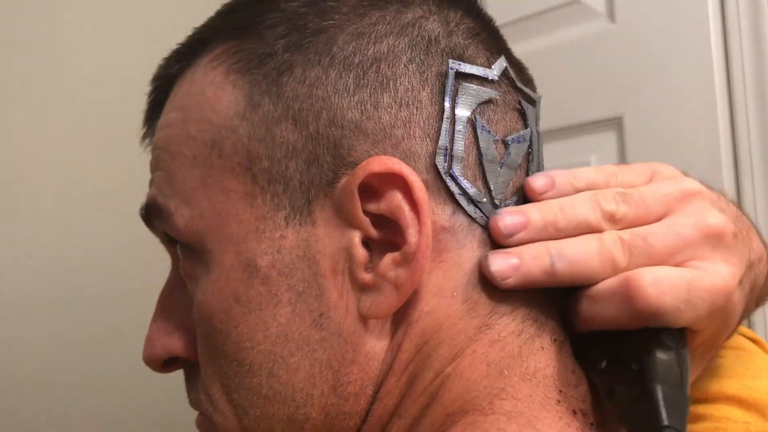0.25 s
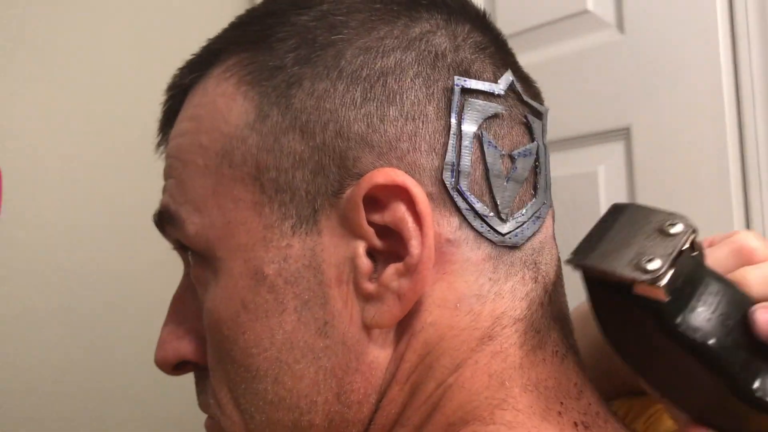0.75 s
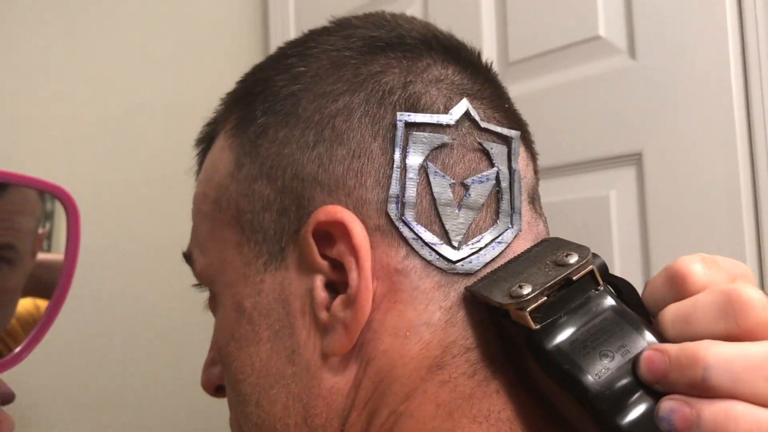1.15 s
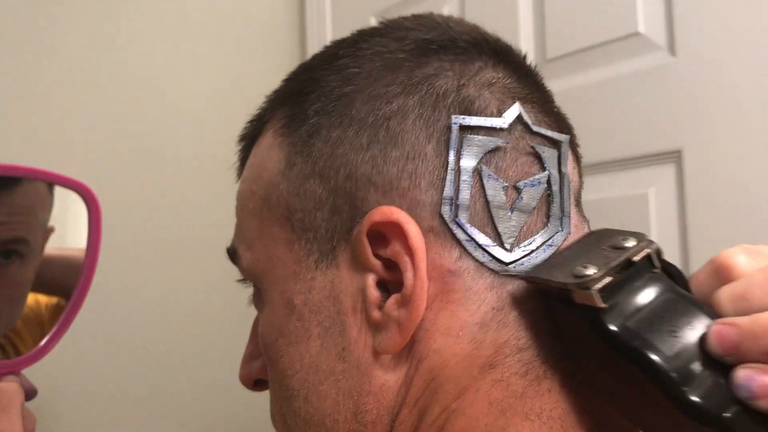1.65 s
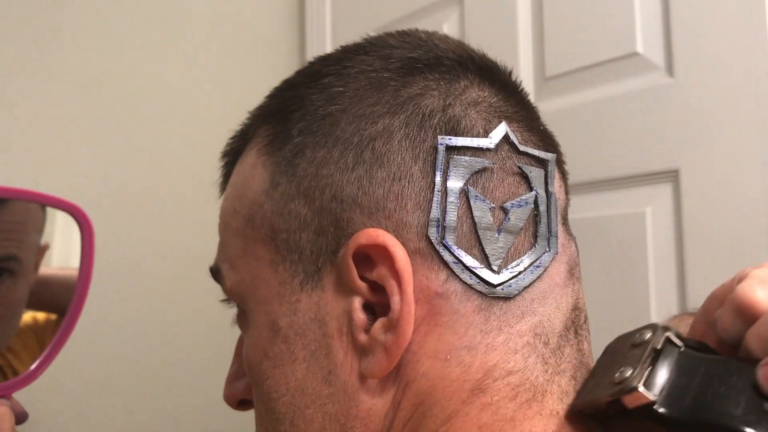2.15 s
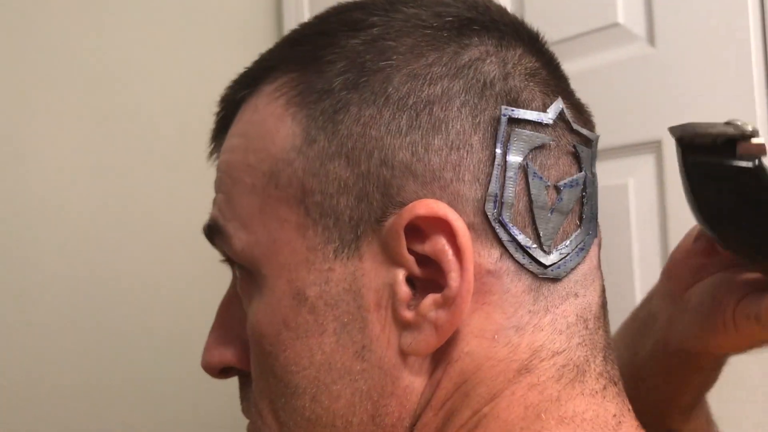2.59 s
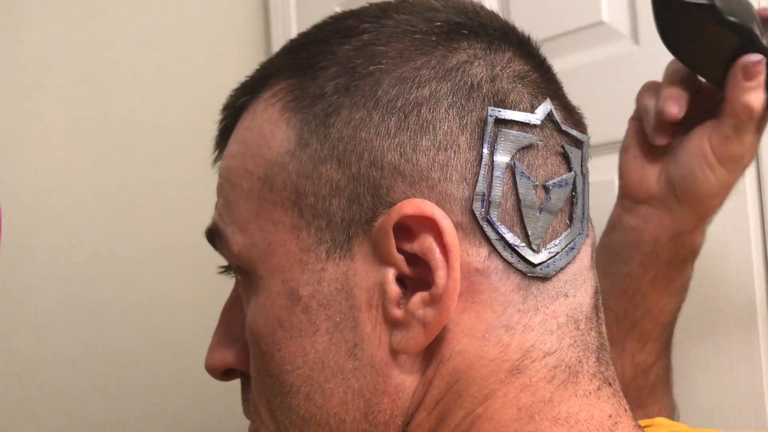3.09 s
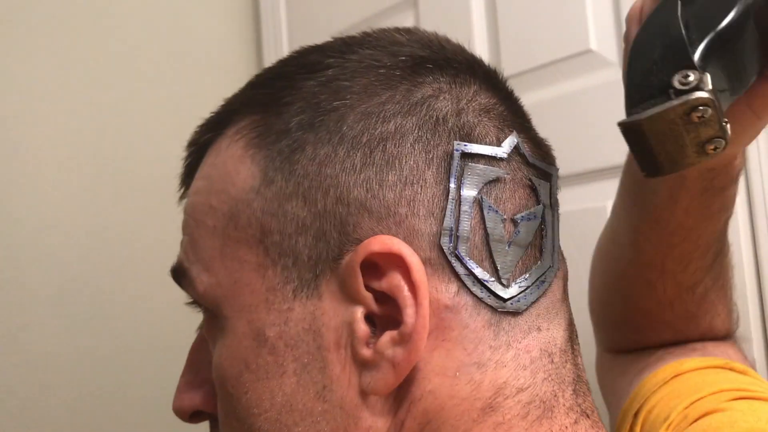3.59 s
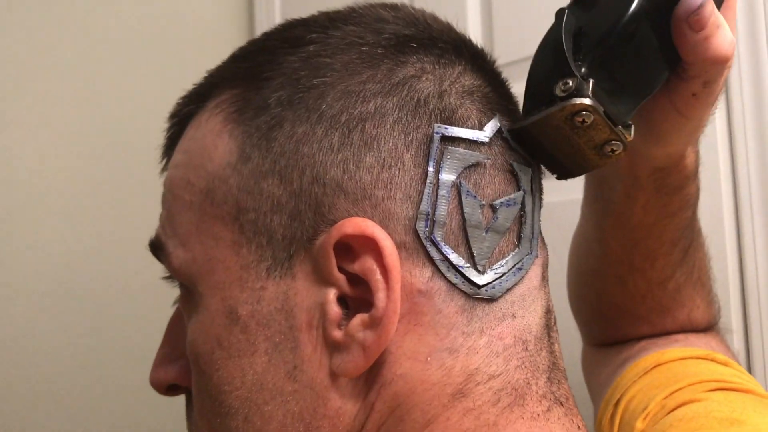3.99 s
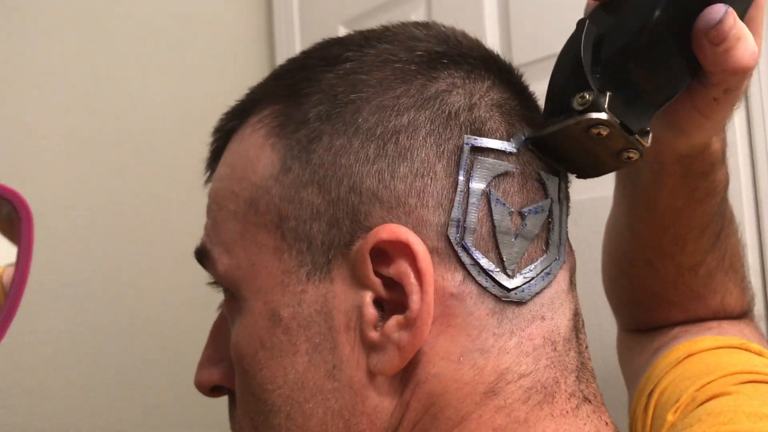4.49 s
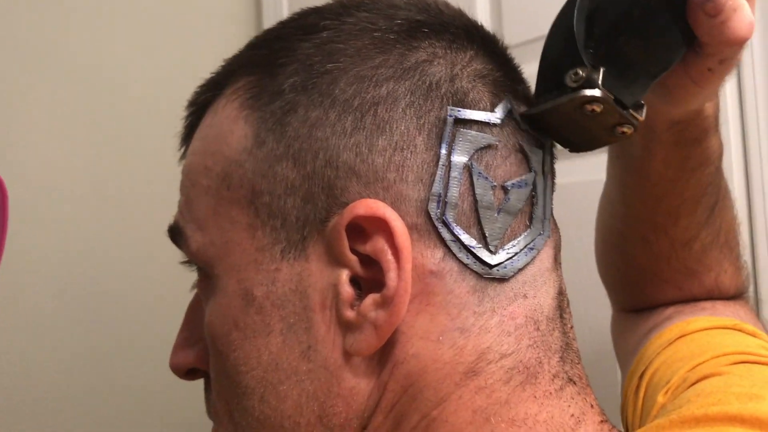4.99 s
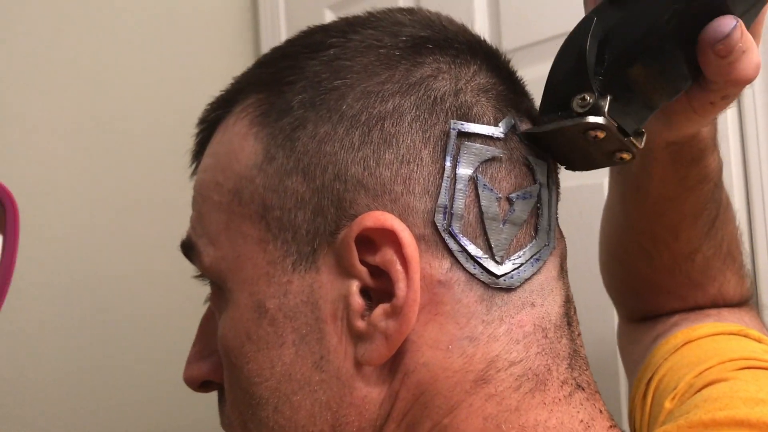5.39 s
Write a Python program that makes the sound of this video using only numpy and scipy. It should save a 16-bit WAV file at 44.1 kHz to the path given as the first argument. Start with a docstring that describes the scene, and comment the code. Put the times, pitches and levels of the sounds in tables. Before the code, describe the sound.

A steady low motor hum with a nasal, metallic buzz and fine blade hiss, recorded close between near walls. After a brief muffled spell the tone becomes fuller, with gritty snips, a sharp tooth click and a soft thud; midway it drops thinner as the clippers swing away, then repeated short crunchy strokes follow to the end, with faint hand bumps.

```python
"""Mains hair clippers buzz close to the microphone in a small room while a man trims his own hair.
A last bite of hair clears as he palms them; he lifts them and shaves the nape in short strokes, with one soft thud.
He swings them through the air and overhead, then edges the back of the crown and tips them to the end.
Harmonics of one blade stroke make the buzz; noise gated by that stroke makes the hairs snap and the blade hiss.
Short noise bursts are catches of the teeth and bumps of hand and case; quiet room air lies beneath."""
import sys
import numpy as np
from scipy import signal
from scipy.fft import rfft, irfft
from scipy.io import wavfile

SR = 44100
rng = np.random.default_rng(int(sys.argv[2]) if len(sys.argv) > 2 else 0)


def put_to_file(sound):
    """Save the sound as 16-bit audio at rate SR, in the file named by the first command-line argument."""
    columns = np.atleast_2d(sound).T  # one column per channel
    safe = np.clip(columns, -1, 1)
    whole_steps = np.round(safe * 32767)
    wavfile.write(sys.argv[1], SR, whole_steps.astype(np.int16))


N = 249165
T = np.arange(N) / SR  # time [s]
STROKE_HZ = 359.87  # mean rate of the blade stroke


def undb(db):
    """Decibels to gain."""
    return 10 ** (np.asarray(db) / 20)


def unit(x):
    """Scale to rms 1."""
    return x / np.sqrt(np.mean(x ** 2))


def curve(table, axis=1):
    """One column of a table, joined by straight lines in time."""
    rows = np.array(table)
    return np.interp(T, rows[:, 0], rows[:, axis])


def colour(x, table, axis=1):
    """Filter by a spectrum of (frequency, dB) points joined over log frequency; rms 1."""
    rows = np.array(table)
    hz = np.fft.rfftfreq(N, 1 / SR)
    db = np.interp(np.log(hz + 1), np.log(rows[:, 0]), rows[:, axis])
    return unit(irfft(rfft(x) * undb(db), N))


def walk(turns):
    """Smooth random course of spread near 1 that reaches a new value at every whole turn."""
    points = rng.standard_normal(4096)
    i = turns.astype(int)
    ease = np.sin(np.pi / 2 * (turns - i)) ** 2
    return points[i] + ease * (points[i + 1] - points[i])


def resonate(x, hz, width):
    """One ringing resonance of a given bandwidth [Hz]; rms 1."""
    return unit(signal.lfilter(*signal.iirpeak(hz, hz / width, fs=SR), x))


def repeat(x, memory):
    """Each stroke partly repeats the one before, so noise gathers round the harmonics; rms 1."""
    one_stroke = np.exp(-2j * np.pi * np.fft.rfftfreq(N, 1 / SR) / STROKE_HZ)  # delay by one stroke
    return unit(irfft(rfft(x) / (1 - np.tanh(memory) * one_stroke), N))


# colour of the air in the small room, relative: (frequency [Hz], level [dB])
AIR_COLOUR = [(25, -55), (50, -50), (70, -26), (100, -11), (140, 3.5), (200, 3), (300, 2), (500, -4.5),
              (900, -4.5), (1500, -10.5), (4000, -29), (15000, -25)]


def air(hum_hz=144.7, hum_db=-84.5):
    """Room background: low-weighted noise of slightly restless level, with a faint hum of drifting phase."""
    air_db, restless_db = -72, 1.2
    hum = np.sqrt(2) * undb(hum_db) * np.sin(2 * np.pi * hum_hz * T + walk(T * 4))
    level = undb(air_db + restless_db * walk(T * 9))
    return hum + level * colour(rng.standard_normal(N), AIR_COLOUR)


def room(x, t60=0.1, wet_db=-7.5):
    """Close walls: a short tail of decaying noise, t60 [s], that begins 3 ms after the direct sound."""
    t = T[:SR // 2]
    tail = rng.standard_normal(len(t)) * np.exp(-np.log(1000) * t / t60) * (t > .003)
    echo = signal.fftconvolve(x, tail / np.linalg.norm(tail))[:N]
    return x + undb(wet_db) * echo


def burst(start, db, low_hz, high_hz, decay, grain, tap):
    """A short contact: a first touch, then gritty noise that dies away, both in one band."""
    t = T[:SR // 4]
    roughness = undb(grain * rng.standard_normal(len(t)))  # grain is its spread in dB
    grit = unit(rng.standard_normal(len(t)) * roughness) * np.exp(-t / decay)
    grit[0] += tap * np.sqrt(SR * .001)
    edges = [low_hz, min(high_hz, SR / 2 - 1000)]
    hit = signal.sosfilt(signal.butter(2, edges, "band", fs=SR, output="sos"), grit)
    hit *= undb(db) * np.sqrt(decay * SR / 2) / np.linalg.norm(hit)  # energy set by level and decay
    return np.pad(hit, (int(start * SR), N))[:N]


def thud(start, hz, db, decay, rumble_db, rumble_decay):
    """A padded blow: a low ring that swells briefly and decays, over a short rumble."""
    age = np.maximum(T - start, 0)
    swell = 1 - np.exp(-age / .011)
    ring = 2 * undb(db) * np.sin(2 * np.pi * hz * age) * np.exp(-age / decay) * swell
    return ring + burst(start, rumble_db, low_hz=58, high_hz=100, decay=rumble_decay, grain=1, tap=1)


# Levels below are those of the direct sound, before the room tail.
# teeth catch a tuft or scrape the skin: (time [s], level [dB], lowest [Hz], highest [Hz], decay [s])
TOOTH_CATCHES = [(0.441, -67, 810, 8000, .03), (.578, -59, 2500, 6500, .02), (.665, -62, 6000, 15000, .008),
                 (.732, -53.5, 2000, 15000, .014), (.772, -53, 1500, 15000, 0.013),
                 (1.286, -42.5, 536, 15000, 0.013), (1.739, -49, 1536, 12100, 0.0055),
                 (2.468, -49, 4000, 13000, 0.0043), (2.598, -51, 1587, 9600, 0.0099),
                 (3.068, -59, 2500, 14000, .012), (3.102, -58.5, 1800, 4000, 0.0063),
                 (3.158, -63, 2000, 8000, 0.014), (3.504, -46.5, 1820, 7700, 0.0074),
                 (3.856, -60, 11200, 14000, 0.0075)]
# fingers and case bump against the head: (time [s], level [dB], lowest [Hz], highest [Hz], decay [s])
HAND_BUMPS = [(0.733, -63, 150, 1200, 0.025), (1.448, -62, 170, 750, 0.014),
              (2.448, -43, 129.7, 1500, 0.0027), (2.848, -63.5, 150.2, 1120, 0.027),
              (3.239, -62.5, 348, 1290, 0.023), (3.338, -59, 130.5, 755, 0.01),
              (3.505, -57, 379, 1110, 0.0098), (3.549, -60, 121, 261, 0.0043),
              (3.972, -57.5, 245, 1400, 0.014), (4.653, -54, 219.6, 700, 0.0029),
              (4.918, -46.5, 183, 694, 0.0019), (5.375, -56, 400, 1090, 0.012)]
# one soft thud; its ring level is nominal, before the swell:
# (time [s], ring [Hz], ring level [dB], ring decay [s], rumble level [dB], rumble decay [s])
SOFT_THUD = (1.832, 190, -53.5, .028, -66, .065)


def handling(catch_tap=1.3, bump_tap=1.8):
    """Contacts close to the microphone: brief noise bursts for teeth and hand, and one soft thud."""
    catches = sum(burst(*row, grain=2.9, tap=catch_tap) for row in TOOTH_CATCHES)
    bumps = sum(burst(*row, grain=2.3, tap=bump_tap) for row in HAND_BUMPS)
    return catches + bumps + thud(*SOFT_THUD)


# ways of holding the clippers; levels at the reference ring, before load and random changes:
# name: (blade whine [dB], tooth sizzle [dB], bare blade hiss [dB], unsteadiness [0-1])
GRIP_SETTINGS = {"palm": (-66.5, -59, -65, 0.28), "lifted": (-72.5, -63.5, -59.5, 0.67),
                 "nape": (-63, -59.5, -63.5, 0.67), "air": (-71.5, -63, -62.5, 0.5),
                 "overhead": (-63, -62.5, -64.5, 0), "crown": (-67.5, -62.5, -68.5, 0.3),
                 "tipped": (-69.5, -62, -70, 0.1)}
# changes of hold, starting just lifted off the skin: (start [s], length [s], new grip)
GRIP_MOVES = [(0.053, 0.076, "palm"), (.57, .06, "lifted"), (.7, .16, "nape"), (2.424, 0.13, "lifted"),
              (2.74, 0.088, "air"), (3.143, 0.11, "overhead"), (3.397, 0.16, "crown"), (4.6, .7, "tipped")]


def holds():
    """Share of each grip over time; every move of the hand blends linearly into the next grip."""
    names = np.array(list(GRIP_SETTINGS))[:, None]
    share = (names == "lifted") * np.ones(N)
    for start, length, name in GRIP_MOVES:
        done = np.clip((T - start) / length, 0, 1)
        share = (1 - done) * share + done * (names == name)
    return share


def grip_settings(share):
    """The four grip columns, blended by the share of each grip."""
    return np.array(list(GRIP_SETTINGS.values())).T @ share


RING_REF_DB = -57  # housing ring at which the grip levels apply
# housing ring as it turns towards and away from the microphone, before load: (time [s], level [dB])
HOUSING_RING = [(.02, -49), (.11, -61.5), (.57, -61), (.68, -53.5), (.95, -46.5), (2.06, -46),
                (2.42, -48.5), (2.56, -54.5), (2.75, -54), (2.89, -66), (3.0, -68), (3.24, -60),
                (3.42, -68.5), (3.6, -58), (4.5, -59), (5.62, -56)]


def facing():
    """How far [dB] the housing's turn to the microphone lifts its ring above the reference."""
    return curve(HOUSING_RING) - RING_REF_DB


# passes through the hair; cutting level at mid-pass, before the snips' own gain and patchiness:
# (start [s], end [s], cutting level [dB], swell from start to end [dB])
HAIR_PASSES = [(-.02, 0.082, -63, -4), (.70, .80, -62, 1), (0.84, 0.867, -54.5, 0), (1.31, 1.49, -68.5, -4),
               (1.514, 1.622, -55.5, 4), (1.737, 1.872, -53.5, 4.5), (1.95, 2.055, -55.5, -1),
               (2.061, 2.162, -48.5, -3.5), (2.204, 2.328, -60, 2), (2.351, 2.40, -51.5, -4),
               (3.955, 4.082, -56, -7), (4.099, 4.174, -48.5, 9), (4.25, 4.306, -52, 5),
               (4.343, 4.419, -48.5, 0.5), (4.501, 4.639, -51.5, -1), (4.742, 4.858, -55.5, 4),
               (4.978, 5.085, -55.5, 1), (5.24, 5.315, -52, -4), (5.425, 5.517, -53, 0),
               (5.623, 5.7, -54.5, 3)]


def hair():
    """Cutting amplitude: each pass bites quickly, swells or thins as it goes, and clears."""
    bite_s, clear_s = 0.016, 0.013  # time to rise or fall by a factor e before and after a pass
    power = 0
    for start, end, db, swell_db in HAIR_PASSES:
        along = np.clip((T - start) / (end - start), 0, 1)
        outside = np.maximum(start - T, 0) / bite_s + np.maximum(T - end, 0) / clear_s
        amplitude = undb(db + swell_db * (along - .5)) * np.exp(-np.minimum(outside, 20))
        power = power + amplitude ** 2
    return np.sqrt(power)


# colour of snapping hairs, relative: (frequency [Hz], nape [dB], crown [dB])
SNIP_COLOUR = [(100, -38, -53), (500, -22, -34), (1400, -17.5, -59), (1816, 5, -5.5), (2350, -0.5, -1),
               (2770, -4.5, -8.5), (4740, -4.5, -3.5), (5530, -9, -12.5), (6500, -7.5, -3),
               (7700, -4.5, -8.5), (10950, -4.5, -8), (11500, -15, -13.5), (13000, -0.5, -0.5),
               (15800, -13, -10.5)]
# blade resonances struck by the hairs, relative to that colour:
# (frequency [Hz], width [Hz], nape [dB], crown [dB])
BLADE_RESONANCES = [(4350, 240, -13.5, -28), (4670, 160, -26, -15), (12450, 360, -25, -9)]
# colour of the blade sliding with no hair in it, relative: (frequency [Hz], level [dB])
SLIDE_COLOUR = [(100, -14), (500, -3.5), (1300, -6.5), (2300, 2.5), (4400, -3.5), (6000, -2), (8500, -15.5),
                (9800, -4.5), (10700, 1), (12000, -3.5), (13900, -6), (14600, -12), (15600, -12)]


def cutting(phase, share, facing_db, cut, gate=0.48, snag=0.45, idle_snag=1.0, snip_db=1.16, patchy_db=1.0):
    """Hairs snap as the teeth close, over a blade hiss that pulses with each stroke and changes with the grip."""
    closing = np.exp(gate * np.cos(phase))
    snaps_per_s, tuft_db, unrest_db, hiss_follow = 9000, 1.6, 2.4, 0.12  # follow: dB per dB of facing
    snaps = (rng.random(N) < snaps_per_s / SR) * rng.standard_normal(N)
    snaps = repeat(snaps * closing * undb(tuft_db * walk(T * 160)), snag)
    nape = colour(snaps, SNIP_COLOUR, axis=1)
    crown = colour(snaps, SNIP_COLOUR, axis=2)
    for hz, width, nape_db, crown_db in BLADE_RESONANCES:
        ring = resonate(snaps, hz, width) * undb(unrest_db * walk(T * 50))  # skin damps the blade unevenly
        nape = nape + undb(nape_db) * ring
        crown = crown + undb(crown_db) * ring
    turned = share[-2:].sum(axis=0)  # both grips at the crown
    snips = (1 - turned) * unit(nape) + turned * unit(crown)
    snips *= undb(snip_db + patchy_db * walk(T * 35))
    rub = rng.standard_normal(N) * closing * undb(unrest_db * walk(T * 60))
    hiss = colour(repeat(rub, idle_snag), SLIDE_COLOUR)
    _, _, hiss_db, _ = grip_settings(share)
    return cut * snips + undb(hiss_db + hiss_follow * facing_db) * hiss


# motor hum at the microphone: (time [s], level [dB])
MOTOR_HUM = [(0.02, -42), (0.06, -43), (0.1, -53.5), (0.21, -49), (0.63, -56), (0.67, -44.5), (0.89, -41),
             (1.14, -42.5), (2.2, -42), (2.75, -43), (3.0, -53.5), (3.11, -44.5), (3.31, -53.5),
             (3.42, -63.5), (3.62, -55), (3.83, -52.5), (4.28, -53.5), (5.62, -52)]


def motor_hum(phase):
    """The motor's fundamental: one sine at the stroke rate."""
    return np.sqrt(2) * undb(curve(MOTOR_HUM)) * np.cos(phase)


# Harmonics 2 and 3 keep these levels before wandering; above them only the balance within a group counts.
# lower harmonics: (multiple, palm [dB], nape [dB], air [dB], crown [dB], tipped [dB])
HOUSING_HARMONICS = [(2, -69.5, -68.5, -73, -79.4, -74), (3, -66, -71, -76.5, -69.5, -69),
                     (4, -99, -68, -96, -85, -84.5), (5, -58.5, -49, -66.5, -65.5, -67.5),
                     (6, -72, -53.5, -74, -62.5, -57.5), (7, -66, -51.5, -74, -70.5, -70.5),
                     (8, -76, -71.5, -73, -67, -68), (9, -72, -60.5, -76, -80, -76),
                     (10, -72, -66.5, -77.5, -75, -71), (11, -78, -70, -71.5, -77, -75.2),
                     (12, -73, -55, -74, -83, -89), (13, -68.9, -76, -75, -64, -65),
                     (14, -74.5, -74, -78, -75, -79)]
# outline of the upper harmonics: (multiple, palm [dB], nape [dB], air [dB], crown [dB], tipped [dB])
BLADE_HARMONICS = [(16, -75.8, -79.9, -78.5, -82.2, -81.2), (17, -76.2, -71.2, -74.7, -76.8, -78.2),
                   (19, -74.7, -71.1, -78.4, -77.8, -77.5), (22, -73.3, -74.0, -82.3, -82.9, -82.3),
                   (24, -79.6, -80.7, -84.7, -81.3, -82.5), (26, -82.9, -76.6, -82.8, -74.8, -74.4),
                   (28, -79.9, -67.5, -78.4, -75.8, -82.2), (29, -74.7, -72.7, -75.8, -79.8, -75.7),
                   (30, -72.0, -66.5, -75.4, -79.2, -86.0), (31, -72.0, -74.1, -82.4, -79.3, -80.3),
                   (35, -81.1, -78.0, -79.4, -79.3, -80.3), (38, -70.7, -75.8, -80.4, -76.5, -79.1),
                   (39, -71.9, -78.3, -78.7, -81.0, -82.3), (41, -84.7, -85.5, -89.3, -88.9, -87.5)]
# grip names of the harmonic columns, in order: (name)
TONE_COLUMNS = ["palm", "nape", "air", "crown", "tipped"]
# grips that share another's harmonics: name: (name of the other grip)
SHARED_TONES = {"lifted": "nape", "overhead": "air"}


def harmonic_balance(k, share):
    """Level [dB] of each multiple k of the stroke, blended over the grips."""
    rows = np.array(HOUSING_HARMONICS + BLADE_HARMONICS)
    tones = {}
    for name, column in zip(TONE_COLUMNS, rows[:, 1:].T):
        tones[name] = np.interp(k, np.round(rows[:, 0]), column)
    return np.array([tones[SHARED_TONES.get(name, name)] for name in GRIP_SETTINGS]).T @ share


def buzz(phase, share, facing_db, cut, scatter=1.74, wander_db=3.0, turns_per_s=11.98):
    """Harmonics of the blade stroke; each fades and turns on its own as the clippers move among room echoes."""
    step = 64  # samples between control points
    sway, load_sway = .5, .38  # phase spread [rad] from movement and from hair
    full_load_db, shake_db = -45.5, -59  # cutting levels that scale the press and the timing shake
    ring_press_db, whine_press_db = 3.5, 11.5  # limits of the rise under load
    whine_follow, sizzle_follow = 0.34, 0.28  # dB per dB of facing
    t, share, facing_db, cut = T[::step], share[:, ::step], facing_db[::step], cut[::step]
    whine_db, sizzle_db, _, motion = grip_settings(share)
    motion = np.clip(motion, 0, 1)
    path = np.cumsum(motion) * turns_per_s * step / SR

    k = np.arange(2, 44)
    reach = np.minimum(k / 13, 1)  # short waves change most with position
    wander = np.array([r * walk(path) for r in reach])
    size = undb(harmonic_balance(k, share) + wander_db * (1 + motion) * wander)
    ring = (k >= 4) & (k <= 7)
    whine = (k == 12) | (k == 13)
    sizzle = (k > 7) & ~whine
    press = np.tanh(cut / undb(full_load_db))
    levels = [RING_REF_DB + facing_db + ring_press_db * press,
              whine_db + whine_follow * facing_db + whine_press_db * press,
              sizzle_db + sizzle_follow * facing_db]
    for part, level_db in zip([ring, whine, sizzle], levels):
        size[part] *= undb(level_db) / np.linalg.norm(size[part], axis=0)

    load = np.minimum(cut / undb(shake_db) + .15, 1)  # hair in the teeth shakes the timing of the blade
    harmonics = np.zeros(N)
    for multiple, gain, r in zip(k, size, reach):
        moving = sway * walk(path) + load_sway * load * walk(t * 70)
        shift = scatter * rng.standard_normal() + r * moving
        harmonics += np.interp(T, t, gain) * np.cos(multiple * phase + np.interp(T, t, shift))
    return motor_hum(phase) + np.sqrt(2) * harmonics


def scene():
    """One blade stroke drives both the buzz and the cutting; grip, facing and hair load shape them."""
    stroke_hz = STROKE_HZ + 0.0521 * walk(T * 3)
    phase = 2 * np.pi * np.cumsum(stroke_hz) / SR
    controls = holds(), facing(), hair()
    noises = room(cutting(phase, *controls) + handling())
    return (air() + noises + buzz(phase, *controls))[None]


def record(dry):
    """The recorder behind the microphone cuts the top with a steep low-pass."""
    return signal.sosfilt(signal.ellip(14, .1, 80, 15670, fs=SR, output="sos"), dry)


dry = scene()
out = record(dry)
put_to_file(out)
```